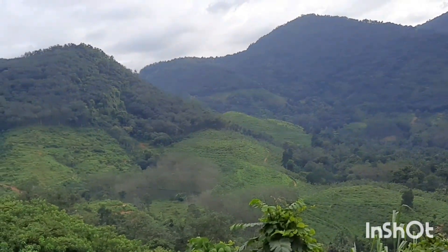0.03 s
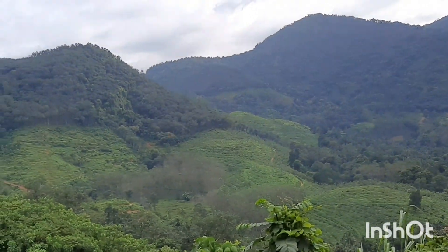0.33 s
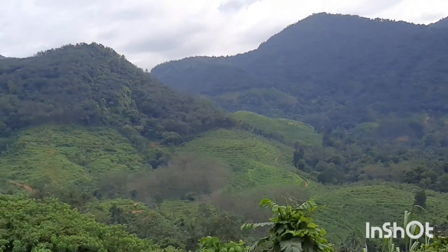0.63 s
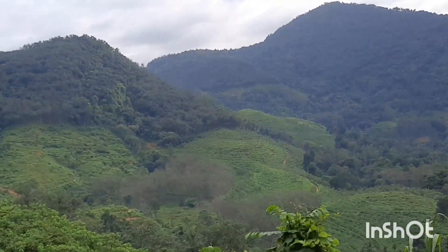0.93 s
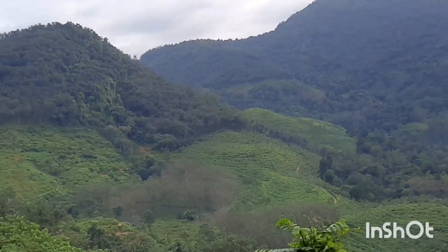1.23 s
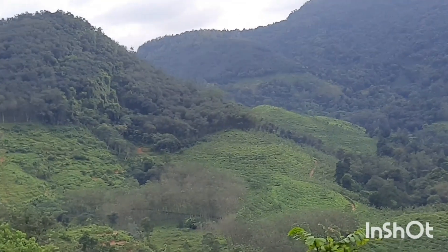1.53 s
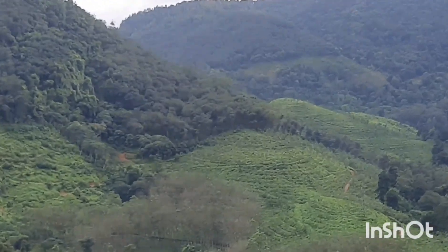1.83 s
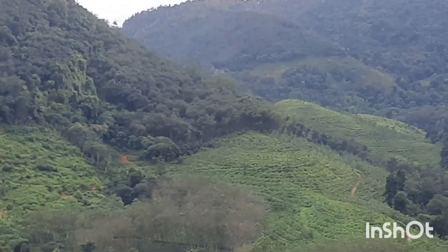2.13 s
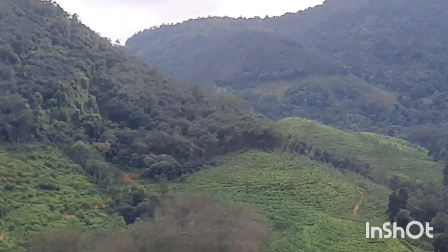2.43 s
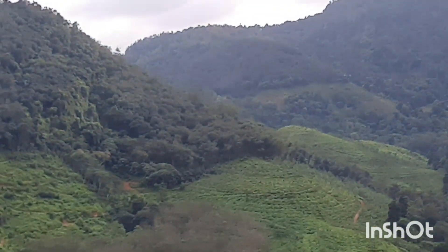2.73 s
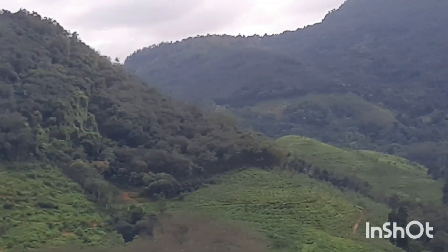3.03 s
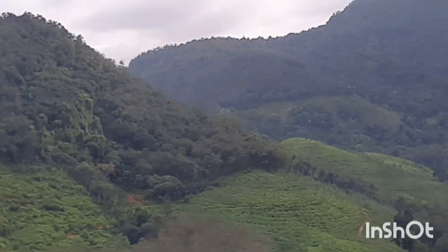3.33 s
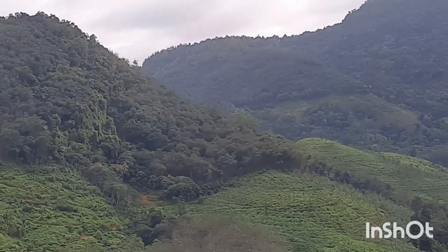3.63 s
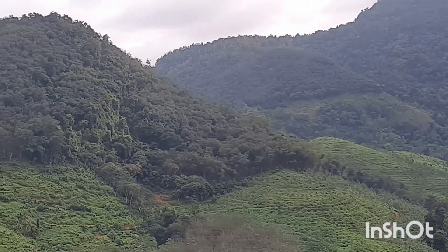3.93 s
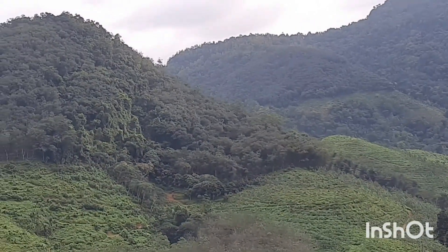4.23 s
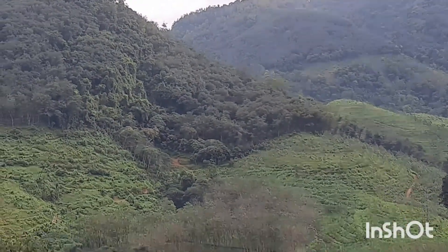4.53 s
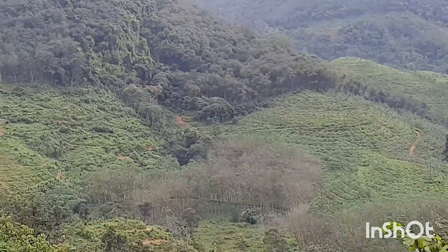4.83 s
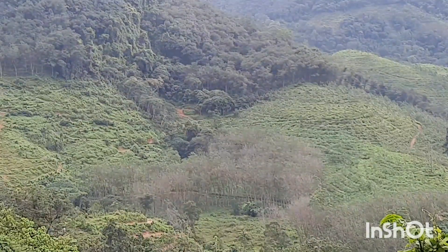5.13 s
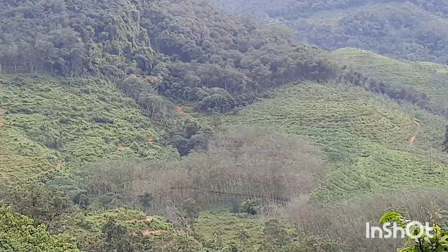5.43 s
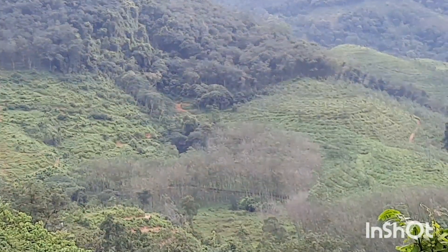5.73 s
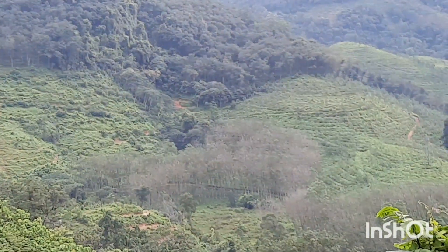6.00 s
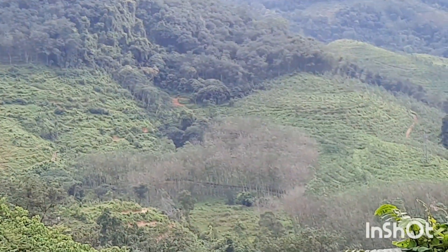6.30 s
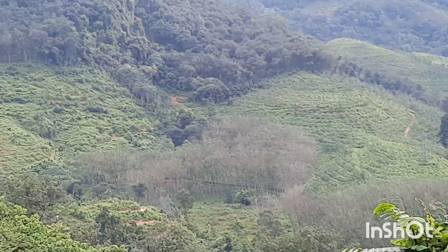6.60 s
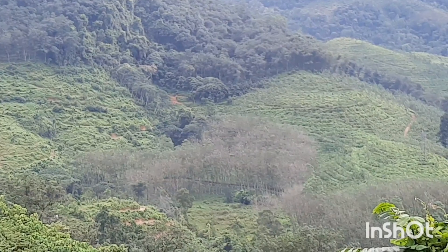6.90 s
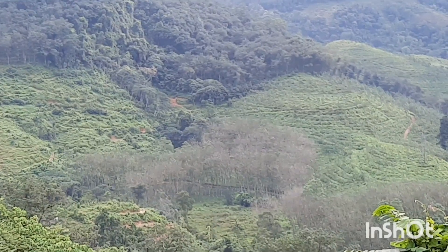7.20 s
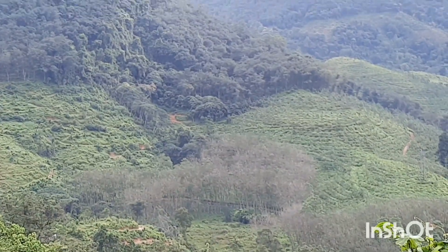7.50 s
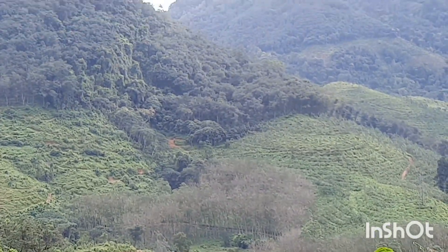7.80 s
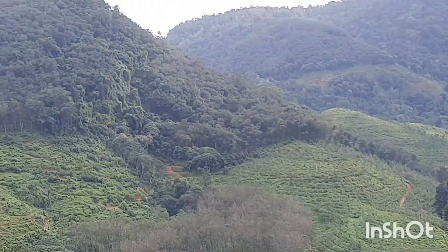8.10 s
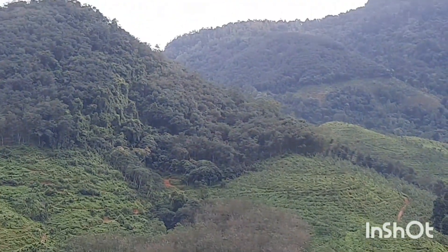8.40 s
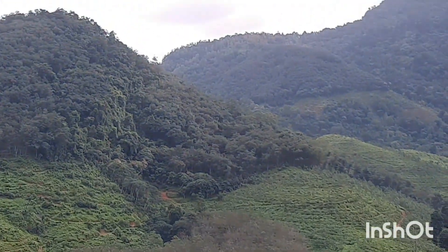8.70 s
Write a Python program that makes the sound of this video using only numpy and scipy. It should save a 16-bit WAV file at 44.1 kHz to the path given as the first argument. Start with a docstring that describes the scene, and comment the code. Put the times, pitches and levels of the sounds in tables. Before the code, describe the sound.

On an open hillside, a bird gives five low, looping whistles that echo off the slopes. Insects hold a faint shrill band and small birds chirp, among soft paired thuds and brief rustles. A faint, distant horn sounds twice. From about halfway a vehicle approaches, its engine throb, gear whine and rushing noise growing until they cover the rest. The sound leans slightly to the microphone's left.

```python
"""A hillside above a valley. From the start insects hold a shrill band, small birds chirp and a hoarse
one cries far off. One bird begins five low, looping whistles, each a near-pure gliding tone that echoes
off the slopes, while soft thuds come in pairs among brief rustles. From 2.5 s a distant horn sounds twice.
After 4 s a vehicle coming up the road clears a shoulder of the hill; near 6.7 s its throttle opens, and
its exhaust throb, gear whine and rush of air grow until they cover the rest."""
import sys
import numpy as np
from scipy import signal
from scipy.fft import rfft, irfft
from scipy.io import wavfile
from scipy.ndimage import uniform_filter1d

SR = 44100
rng = np.random.default_rng(int(sys.argv[2]) if len(sys.argv) > 2 else 0)


def file_out(sig):
    """Save sig as 16-bit WAV at sys.argv[1]."""
    # one column per channel
    cols = np.atleast_2d(sig).T
    # limit, then scale
    lim = np.clip(cols, -1, 1)
    pcm = np.round(lim * 32767).astype(np.int16)
    wavfile.write(sys.argv[1], SR, pcm)


N = 385875
T = np.arange(N) / SR

# whistles (t/s of the downward step, level/dB, first-beat accent/dB, pitch ratio, time stretch)
WHISTLES = [(.378, -30, -5, 1.014, 1.01), (2.225, -30, 5, 1.003, 0.97), (3.486, -28, 4.5, .995, 1.03),
            (5.144, -28, 4.5, 1.0, 0.983), (6.447, -29.5, 5.5, 1.01, 1)]
# the vehicle's growth as it nears (t/s, relative level/dB)
APPROACH_LEVEL = [(1.2, -62.5), (2.8, -57), (4.0, -52.5), (5.2, -43.5), (6.1, -43), (6.8, -40.5),
                  (7.6, -37.5), (8.2, -32.5), (8.75, -28.5)]
# engine cycle rate (t/s, f/Hz)
CYCLE_RATE = [(0, 18.5), (4.2, 18.85), (5.3, 19.4), (6.4, 19.45), (6.9, 20.1), (7.4, 19.9), (8.05, 20.25),
              (8.75, 20.1)]
# line spectra of the engine (multiple of the cycle rate, relative level/dB)
EXHAUST_LINES = [(3, -0.5), (4, -2.5), (5, -10), (6, -3.5), (7, -11.5), (8, -19.5), (9, -17), (10, -11.5),
                 (11, -10), (12, -13), (13, -16), (14, -14.5), (17, -20), (19, -22)]
GEAR_LINES = [(35.7, 1), (46.65, 2), (40.3, -8)]
HIGH_LINES = [(35.2, 1), (76.5, -0.5), (93, -26), (102, -11.5), (123, -3.5), (126, -7.5)]
# noise spectra of the vehicle, insects and valley (f/Hz, relative spectral level/dB)
RUMBLE_SPECTRUM = [(20, -51.5), (35, -31), (50, -10), (68, -0.5), (82, 3), (100, -1), (118, 3),
                   (165, -13.5), (210, -6), (260, -7.5), (380, -22.5), (600, -58.5)]
ROAR_SPECTRUM = [(200, -9), (340, 6), (470, 2), (580, -1.5), (690, 4.5), (770, 3), (880, 2.5), (1100, -1.5),
                 (1500, -30), (2500, -34)]
RUSH_SPECTRUM = [(700, -0.5), (1150, 1.5), (1450, 3.5), (1700, 3), (2000, 3), (2200, 1), (2450, 0),
                 (2800, -3), (3500, -9.5), (4500, -24.5), (7000, -43)]
HISS_SPECTRUM = [(2000, -27), (3800, 12), (5500, 7), (7600, 13), (9000, 1), (12000, -0.5), (15500, -18)]
INSECT_SPECTRUM = [(3240, -55), (5500, -28), (5900, -45), (5980, -20), (6600, -0.5), (6880, 5), (7120, -1),
                   (7520, -13), (8090, -18), (8300, -30.5), (8620, -28), (9910, -20), (10600, -39.5),
                   (11000, -46), (14300, -60), (22000, -120)]
VALLEY_SPECTRUM = [(30, -13), (55, 20.5), (120, 20.5), (170, 2.5), (380, -4.5), (500, -1), (650, 2),
                   (1000, -4.5), (1350, 4), (2000, -7.5), (2500, -6.5), (3200, -23), (4200, -25),
                   (9000, -36.5), (16000, -30)]
# contour of a hoarse cry (t/s from its start, fundamental f/Hz, relative level/dB)
CRY_CONTOUR = [(0, 603, 0.5), (0.049, 662, -2.5), (.14, 664.3, -1), (0.218, 590, -5.5), (0.301, 530.4, -6),
               (0.421, 426, -21.5), (.46, 388, -19)]
# hoarse cries (t/s, level/dB)
CRIES = [(-.14, -46), (3.881, -50)]
# low coos (t/s, duration/s, f/Hz, level/dB)
COO_NOTES = [(4.87, 0.22, 511, -57.5), (5.18, 0.16, 511, -51.5), (6.077, 0.3, 470, -54.5),
             (7.13, 0.12, 548, -51.5)]
# slurred calls deep in the trees (t/s, duration/s, start f/Hz, end f/Hz, level/dB)
TREE_SLURS = [(0, .1, 5370, 6140, -66.5), (.17, 0.075, 3020, 2640, -60), (.77, 0.067, 4840, 4630, -67),
              (1.91, 0.27, 3740, 2880, -65), (2.165, .06, 2610, 2140, -50.5), (2.18, .14, 5230, 5350, -56),
              (2.27, 0.054, 5400, 4020, -55.5), (2.49, .15, 4620, 4140, -67),
              (2.52, .11, 6910, 6630, -51.5), (2.55, 0.099, 6700, 4570, -58),
              (2.66, 0.31, 3650, 2390, -68.5), (7.84, 0.0166, 3830, 3360, -49),
              (8.15, .02, 3640, 3300, -45)]
# sharp downward zips (t/s, level/dB)
ZIP_CALLS = [(1.437, -57), (1.999, -55), (3.9, -54)]
# bursts of thin twittering (t/s, duration/s, level/dB)
TWITTER_BURSTS = [(0.133, .03, -60), (3.029, .09, -56), (3.364, .3, -66), (3.746, .13, -59),
                  (4.617, .44, -58.5), (5.728, .13, -58.5), (6.57, .13, -57)]
# pairs of thuds (t/s of the first, gap/s, level/dB)
THUD_PAIRS = [(.424, 0.27, -33), (1.554, 0.26, -33.5), (2.665, .311, -33), (3.786, .294, -31),
              (4.905, 0.33, -35)]
# brief rustles (t/s, duration/s, f/Hz that scales the band edges, level/dB)
RUSTLE_BURSTS = [(0.278, 0.17, 1680, -48), (1.654, 0.13, 1610, -48.5), (1.798, 0.097, 1390, -51.5),
                 (2.978, 0.1, 1620, -52.5), (4.074, 0.067, 1300, -46), (6.427, 0.14, 9600, -53),
                 (7.091, 0.072, 11000, -49), (7.222, 0.089, 11000, -52), (7.478, .06, 9100, -50.5),
                 (7.64, 0.085, 9400, -46), (8.145, 0.077, 10500, -45.5), (8.698, 0.06, 12800, -40.5)]
# horn blasts (start t/s, end t/s, f/Hz, level/dB)
HORN_BLASTS = [(2.486, 2.728, 215.4, -52), (2.849, 3.998, 217.9, -52)]
# diffuse sound at the two microphones (f/Hz, correlation, left minus right level/dB)
STEREO_FIELD = [(60, 1, 8), (130, 0.92, 1.5), (293, 0.29, 4), (615, 0.47, 5), (1420, -0.45, 9),
                (2560, -0.0049, 6.5), (4100, -0.083, -4.5), (7330, -0.049, 6.5), (14000, 0.021, 1)]

# a whistle opens with a high warble of two beats, and the voice thins at every crest
WARBLE_S, WARBLE_HZ, WARBLE_DEPTH_HZ, WARBLE_BEAT_S, WARBLE_DB, CREST_DB = .074, 1468, 45.5, .0285, -5.5, -9
ATTACK_S, ACCENT_S, STEP_S = .017, .016, .014
# then it drops to a hoot that swells, lifts in pitch and dies away
HOOT_S, HOOT_HZ, HOOT_LIFT_HZ, LIFT_AT_S, LIFT_S = .14, 1249.7, 72, .0761, .061
HOOT_PEAK_S, HOOT_WIDTH_S, RELEASE_S = .05, .085, .02
# a shoulder of the hill screens the vehicle's higher sounds until it is cleared
CLEARS_AT_S, CLEARING_S, SCREEN_RUSH_DB, SCREEN_HISS_DB, SCREEN_WHINE_DB = 4.33, 1, -1.5, -12.5, -21
# on the last stretch the throttle opens and the top of the hiss gets through
THROTTLE_AT_S, OPENING_S, THROTTLE_DB, BRIGHTENING_S, TOP_FAR_DB, TOP_NEAR_DB = 6.66, .56, 13, 1.4, -23, 8
NEAR_DB = -29  # approach level that counts as near; a "growth" is the share of its rise a part follows
GEAR_SWELL_AT_S, GEAR_WIDTH_S, GEAR_SWELL_DB = 8.08, .58, 11.5
# a soft falling note leads in to every whistle
LEAD_AHEAD_S, LEAD_S, LEAD_FROM_HZ, LEAD_TO_HZ, LEAD_DB = .166, .036, 1145, 1057, -22.5
# a run of rising notes, weaker before and after its loudest
RUN_START_S, RUN_PERIOD_S, RUN_NOTE_S, RUN_FROM_HZ, RUN_TO_HZ = .04, .247, .125, 2560, 3350
RUN_DB, RUN_LOUDEST_S, RUN_FADE_DB_PER_S = -59, .31, 11.5
ZIP_S, ZIP_FROM_HZ, ZIP_TO_HZ = .024, 7740, 5830
TICK_PERIOD_S, TICK_S, TICK_HZ, TICK_SPREAD_HZ, TICK_FALL_HZ = .057, .031, 7880, 150, 402


def whistling_bird(waver=.0024):
    """Harmonic radiation: a nearly pure tone with a faint octave, brighter on the high warble."""
    voice, octave, wobble = np.zeros(N), np.zeros(N), walk(150)
    for at, db, accent_db, ratio, stretch in WHISTLES:
        t = np.arange(-WARBLE_S * stretch, HOOT_S * stretch, 1 / SR)
        hz, envelope = whistle_contour(t / stretch, accent_db)
        phase = phase_of(ratio * hz * (1 + waver * wobble[int(at * SR):][:len(t)]))
        amplitude = np.sqrt(2) * undb(db) * envelope
        add(voice, at + t[0], amplitude * np.sin(phase))
        add(octave, at + t[0], amplitude * (hz / hz.mean()) ** 6 * np.sin(2 * phase))
    return hillside_paths(voice, octave)


def whistle_contour(t, accent_db):
    """Frequency and amplitude modulation: an accented warble, a drop at t = 0, a lifting hoot."""
    since, dropped = t + WARBLE_S, ease(t, 0, STEP_S)
    beat = -np.cos(2 * np.pi * np.maximum(since - ATTACK_S, 0) / WARBLE_BEAT_S)
    warble_hz = WARBLE_HZ + WARBLE_DEPTH_HZ * beat
    hoot_hz = HOOT_HZ + HOOT_LIFT_HZ * ease(t, LIFT_AT_S, LIFT_S)
    warble = undb(WARBLE_DB + accent_db * swell(since, ATTACK_S, ACCENT_S) + CREST_DB * np.maximum(beat, 0))
    hoot = swell(t, HOOT_PEAK_S, HOOT_WIDTH_S)
    edges = np.clip(since / ATTACK_S, 0, 1) * np.clip((HOOT_S - t) / RELEASE_S, 0, 1)
    return warble_hz + dropped * (hoot_hz - warble_hz), edges * (warble + dropped * (hoot - warble))


def hillside_paths(voice, octave):
    """Multipath interference: reflections beat against the direct sound where the pitch moves fast."""
    direct = np.array([voice, delayed(voice, .00056)])
    ground = undb(-15.5) * np.array([delayed(voice, .016), delayed(voice, .0165)])
    bank = undb(-17) * np.array([delayed(voice, .061), delayed(voice, .038)])
    trees = undb(-21) * scatter(voice, t60=.99) + undb(-23) * scatter(voice, t60=3.2)
    far_slope = undb(-24) * scatter(delayed(voice, .69), t60=1)
    diffuse_octave = undb(-30) * scatter(octave, t60=.94)
    return pan(5.1) * (direct + ground + bank + diffuse_octave) + pan(3) * (trees + far_slope)


def vehicle(rumble_growth=.63, hiss_growth=.88, clatter=.17, reflection=.16, top_hz=11000):
    """Attenuation by distance and screening: the rumble carries furthest, the top of the hiss comes last."""
    near_db = over_time(APPROACH_LEVEL) - NEAR_DB
    screened = 1 - ease(T, CLEARS_AT_S, CLEARING_S)
    motor, cycle_phase = engine(near_db, screened)
    firing = 1 + clatter * np.cos(4 * cycle_phase)  # four firings a cycle pulse the noise
    rumble = field(RUMBLE_SPECTRUM) * undb(-25 + rumble_growth * near_db + 1.57 * walk(15))
    roar = field(ROAR_SPECTRUM) * undb(-34.5 + near_db + .8 * walk(16))
    rush = field(RUSH_SPECTRUM) * undb(-37 + near_db + SCREEN_RUSH_DB * screened + .9 * walk(30))
    road = (roar + rush) * firing
    road += reflection * np.array([delayed(side, .0052) for side in road])  # comb filtering
    hiss_db = -50 + hiss_growth * near_db + SCREEN_HISS_DB * screened
    hiss = field(HISS_SPECTRUM) * undb(hiss_db + 1.2 * walk(45))
    low_hiss = irfft(rfft(hiss) / (1 + (np.fft.rfftfreq(N, 1 / SR) / top_hz) ** 10), N)
    top_db = TOP_FAR_DB + (TOP_NEAR_DB - TOP_FAR_DB) * ease(T, THROTTLE_AT_S, BRIGHTENING_S)
    return motor + rumble + road + low_hiss + (hiss - low_hiss) * undb(top_db)


def engine(near_db, screened, throb_growth=.45, high_growth=.18, jitter=.00387, lump_db=1.6):
    """Periodic excitation: the exhaust throbs on harmonics of the engine cycle, with whines above."""
    hz = over_time(CYCLE_RATE)
    phase = phase_of(hz * (1 + jitter * walk(20)))
    harmonics = sum(undb(db + lump_db * walk(6.9)) * np.sin(k * phase + 2 * np.pi * rng.random())
                    for k, db in EXHAUST_LINES)
    throttled = 1 - ease(T, THROTTLE_AT_S, OPENING_S)
    throb = unit(harmonics) * undb(-24.3 + throb_growth * near_db - THROTTLE_DB * throttled)
    gear_db = -47 + near_db + GEAR_SWELL_DB * swell(T, GEAR_SWELL_AT_S, GEAR_WIDTH_S)
    gear = whine(GEAR_LINES, hz, jitter=.00399, fade_db=2.5) * undb(gear_db)
    high_db = -50 + high_growth * near_db + SCREEN_WHINE_DB * screened
    high = whine(HIGH_LINES, hz, jitter=.009, fade_db=3.5) * undb(high_db)
    return pan(5) * throb + pan(6.3) * (gear + high), phase


def whine(lines, hz, jitter, fade_db):
    """Engine orders: lines on multiples of the cycle rate, each wavering and fading on its own."""
    return unit(sum(undb(db + fade_db * walk(16)) * np.sin(phase_of(k * hz * (1 + jitter * walk(60))))
                    for k, db in lines))


def hoarse_bird(rasp=.06):
    """Spectral broadening: fast pitch tremor smears harmonics 2 and 3 of a far, arching cry."""
    times, hz, db = np.transpose(CRY_CONTOUR)
    out = np.zeros(N)
    for at, cry_db in CRIES:
        phase = phase_of(np.interp(T - at, times, hz) * (1 + rasp * walk(400)))
        tone = undb(-1) * np.sin(2 * phase) + np.sin(3 * phase)
        out += tone * undb(cry_db + np.interp(T - at, times, db, left=-np.inf, right=-np.inf))
    return pan(7) * scatter(out, t60=.69, delay=0) * undb(3)


def small_birds():
    """Direct-to-reverberant ratio: notes in the open arrive clear, foliage smears those in the trees."""
    notes, calls = open_notes(), tree_calls()
    clear = undb(.5) * notes + undb(-4) * scatter(notes, t60=.62)
    hidden = undb(-4) * calls + undb(-2) * scatter(calls, t60=.81)
    return pan(11) * clear + pan(2.7) * hidden


def open_notes(run_count=5, coo_rise=.024):
    """Tonal glides with slight tremor: the lead-in notes, the rising run and the low coos."""
    leads = [(at - LEAD_AHEAD_S, LEAD_S, LEAD_FROM_HZ, LEAD_TO_HZ, db + LEAD_DB)
             for at, db, *_ in WHISTLES]
    run = [(at, RUN_NOTE_S, RUN_FROM_HZ, RUN_TO_HZ, RUN_DB - RUN_FADE_DB_PER_S * abs(at - RUN_LOUDEST_S))
           for at in RUN_START_S + RUN_PERIOD_S * np.arange(run_count)]
    coos = [(at, length, hz * (1 - coo_rise / 2), hz * (1 + coo_rise / 2), db)
            for at, length, hz, db in COO_NOTES]
    return glides(leads + run + coos, waver=.014, tremble_hz=313, bend=2)


def tree_calls():
    """Roughness from fast frequency modulation: slurs, zips, and twitters of short falling ticks."""
    zips = [(at, ZIP_S, ZIP_FROM_HZ, ZIP_TO_HZ, db) for at, db in ZIP_CALLS]
    beats = [(at, db) for start, length, db in TWITTER_BURSTS
             for at in np.arange(start, start + length, TICK_PERIOD_S)]
    pitches = TICK_HZ + TICK_SPREAD_HZ * rng.standard_normal(100)
    ticks = [(at, TICK_S, hz, hz - TICK_FALL_HZ, db) for (at, db), hz in zip(beats, pitches)]
    return (glides(TREE_SLURS, waver=.024, tremble_hz=900, bend=1.1)
            + glides(zips, waver=.052, tremble_hz=1500, bend=1.155)
            + glides(ticks, waver=.02, tremble_hz=900, bend=1.5))


def glides(notes, waver, tremble_hz, bend):
    """Swept sines: each eases between two pitches and swells midway; high ones tremble more."""
    out, wobble = np.zeros(N), walk(tremble_hz)
    for at, length, first_hz, last_hz, db in notes:
        u = np.linspace(0, 1, int(length * SR))
        hz = first_hz + (last_hz - first_hz) * np.sin(np.pi * u / 2) ** (2 * bend)
        hz *= 1 + waver * (hz / 5000) * wobble[int(at * SR):][:len(u)]
        envelope = np.sqrt(np.abs(np.sin(np.pi * u)))
        add(out, at, np.sqrt(2) * undb(db) * envelope * np.sin(phase_of(hz)))
    return out


def thuds(hz=71.4, length=.135, second_db=1.5):
    """Tone bursts: a few low cycles in a smooth window sound dull; the second of a pair is stronger."""
    out, t = np.zeros(N), T[:int(length * SR)]
    for first, gap, pair_db in THUD_PAIRS:
        for at, db in ((first, pair_db), (first + gap, pair_db + second_db)):
            burst = np.hanning(len(t)) * np.sin(2 * np.pi * (hz * t + rng.random()))
            add(out, at - length / 2, np.sqrt(2) * undb(db) * burst)
    return pan(4.7) * out


def rustles(grain_db=9.5, low_edge=.16, high_edge=1.24):
    """Band-limited impulsive noise: grainy brushes that start quickly and die away."""
    out, limit_hz = np.zeros((2, N)), SR / 2 - 1
    for at, length, hz, db in RUSTLE_BURSTS:
        u = np.linspace(0, 1, int(length * SR))
        band = signal.butter(3, [hz * low_edge, min(hz * high_edge, limit_hz)], "band", fs=SR, output="sos")
        skirt = signal.butter(4, [hz * low_edge / 2, min(2 * hz, limit_hz)], "band", fs=SR, output="sos")
        grain_sizes = undb(grain_db * rng.standard_normal(len(u)))
        for side in out:
            grains = rng.standard_normal(len(u)) * grain_sizes
            brush = signal.sosfilt(band, grains) + undb(-15) * signal.sosfilt(skirt, grains)
            add(side, at, undb(db) * unit(brush) * np.sin(np.pi * np.sqrt(u)))
    return pan(4) * out


def horn(octave_db=-11):
    """Treble loss over distance: only the lowest two partials of a far horn carry, wavering in level."""
    out = np.zeros(N)
    for start, end, hz, db in HORN_BLASTS:
        t = T[:int((end - start) * SR)]
        tone = np.sin(2 * np.pi * hz * t) + undb(octave_db) * np.sin(2 * np.pi * 2 * hz * t)
        add(out, start, undb(db) * tone * signal.windows.tukey(len(t), .15))
    return pan(2) * out * undb(2.5 + 2.5 * walk(12))


def insects(db=-62.5, flicker_db=1.64):
    """Incoherent summation: many distant insects merge into one shrill band."""
    return field(INSECT_SPECTRUM) * undb(db + flicker_db * walk(40))


def valley(db=-48):
    """Ambient noise: the soft wash of far leaves and air over the low drone of the valley."""
    return field(VALLEY_SPECTRUM) * undb(db + .39 * walk(1))


def field(spectrum):
    """Diffuse-field coherence: coloured noise alike on both sides in the bass, unrelated in the treble."""
    correlation, lean_db = over_frequency(STEREO_FIELD)
    mid, side = rfft(rng.standard_normal((2, N)))
    pair = mid * np.sqrt(1 + correlation) + np.array([[1], [-1]]) * side * np.sqrt(1 - correlation)
    x = irfft(pair * pan(lean_db) * undb(over_frequency(spectrum)[0]), N)
    return x / np.std(x.mean(0))


def scatter(x, t60, delay=.0019):
    """Reverberation: diffuse reflections from leaves and slopes, down 60 dB in t60 seconds."""
    t = T[:2 * SR]
    tail = rng.standard_normal((2, len(t))) * undb(-60 * t / t60) * (t > delay)
    tail /= np.sqrt(np.sum(tail ** 2, axis=1, keepdims=True))
    return signal.fftconvolve(x[None], tail, axes=1)[:, :N]


def delayed(x, seconds):
    """Propagation delay along a longer path."""
    return np.interp(T - seconds, T, x, left=0)


def pan(db):
    """Left and right gains for a level difference."""
    return undb(np.array([db, -db]).reshape(2, -1) / 2)


def walk(rate):
    """Random modulation of rms 1: values held 1 / rate s and smoothed twice."""
    hold = int(SR / rate)
    steps = np.repeat(rng.standard_normal(N // hold + 1), hold)
    return unit(uniform_filter1d(uniform_filter1d(steps, hold), hold)[:N])


def ease(t, at, span):
    """A smooth step from 0 to 1, centred on at and about span seconds long."""
    return .5 + .5 * np.tanh(2 * (t - at) / span)


def swell(t, at, width):
    """A Gaussian bell of height 1."""
    return np.exp(-((t - at) / width) ** 2)


def over_time(table):
    """A timed table interpolated to every sample."""
    return np.interp(T, *np.transpose(table))


def over_frequency(table):
    """The columns of a spectrum table at every bin, interpolated in log frequency."""
    hz, *columns = np.transpose(table)
    f = np.maximum(np.fft.rfftfreq(N, 1 / SR), 1)
    return [np.interp(np.log(f), np.log(hz), column) for column in columns]


def phase_of(hz):
    """Phase as the integral of frequency."""
    return 2 * np.pi * np.cumsum(hz) / SR


def undb(db):
    """Decibels to amplitude ratio."""
    return 10 ** (np.asarray(db) / 20)


def unit(x):
    """Normalisation to rms 1."""
    return x / np.sqrt(np.mean(x ** 2))


def add(out, start, x):
    """Superpose a sound at its start time."""
    i = max(int(start * SR), 0)
    out[i:i + len(x)] += x[:N - i]


def scene():
    """Superposition of all the sources on the hillside."""
    birds = whistling_bird() + hoarse_bird() + small_birds()
    return birds + insects() + thuds() + rustles() + horn() + vehicle() + valley()


def record(dry, cutoff_hz=15700):
    """Band limiting: the phone cuts the top with a steep low-pass."""
    return signal.sosfilt(signal.ellip(10, .1, 80, cutoff_hz, fs=SR, output="sos"), dry)


dry = scene()
out = record(dry)
file_out(out)
```